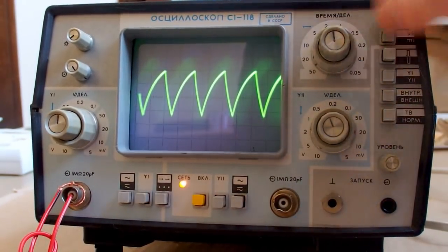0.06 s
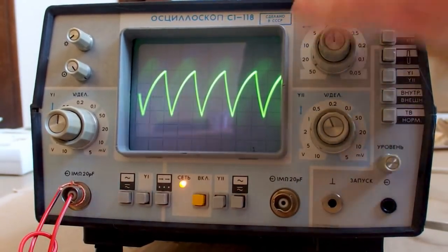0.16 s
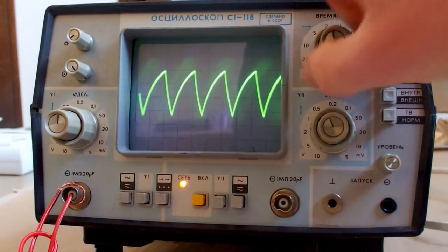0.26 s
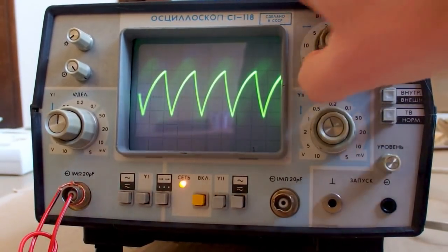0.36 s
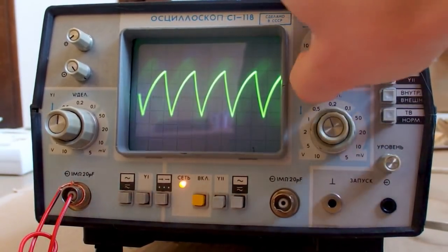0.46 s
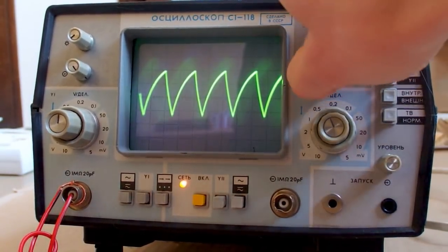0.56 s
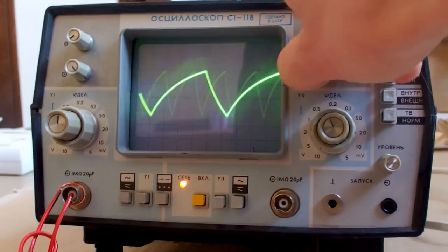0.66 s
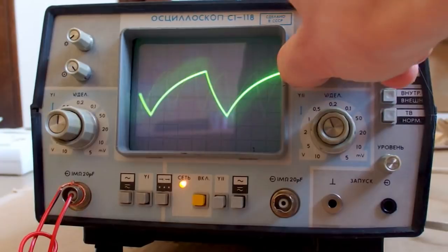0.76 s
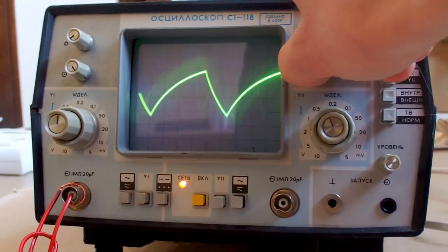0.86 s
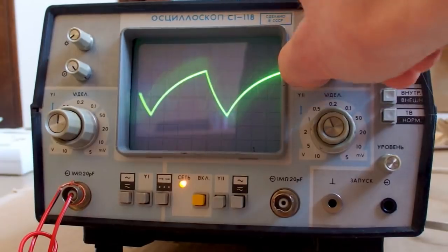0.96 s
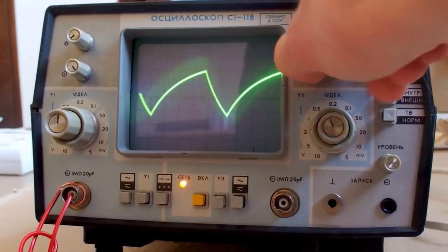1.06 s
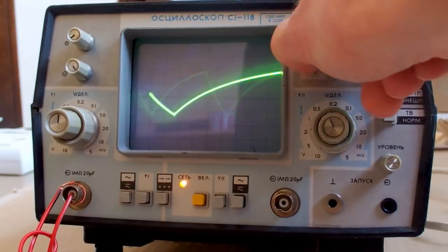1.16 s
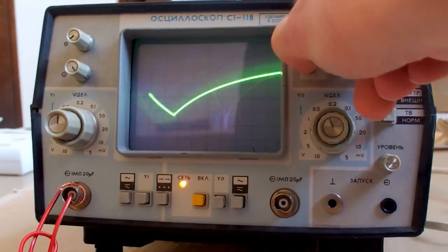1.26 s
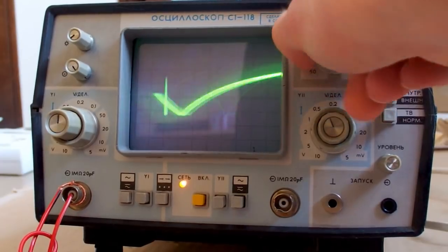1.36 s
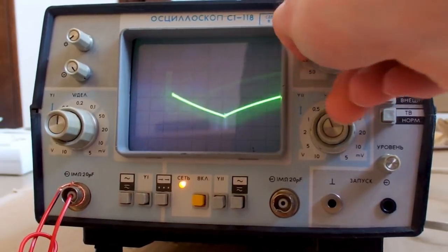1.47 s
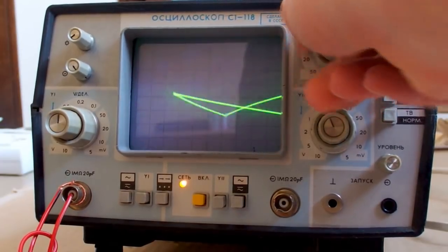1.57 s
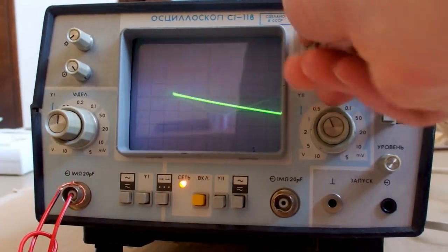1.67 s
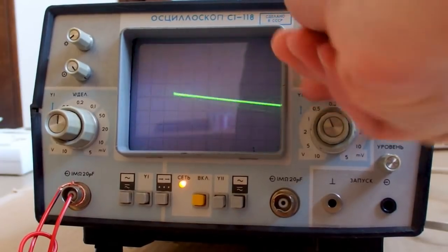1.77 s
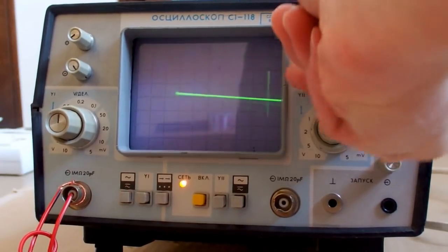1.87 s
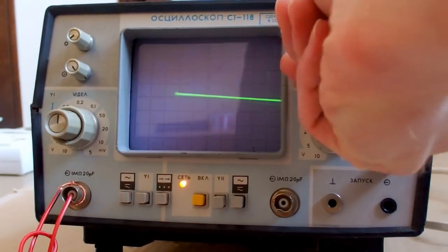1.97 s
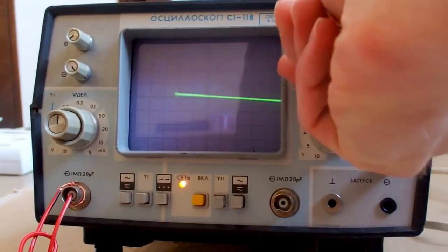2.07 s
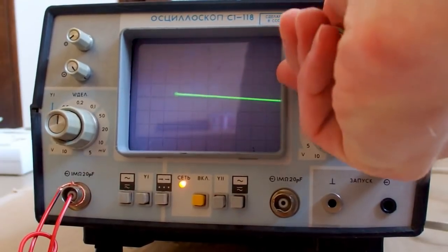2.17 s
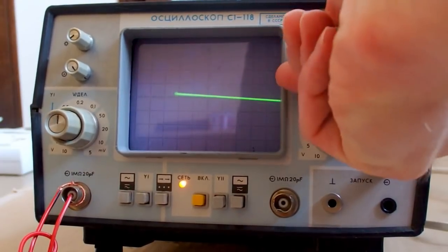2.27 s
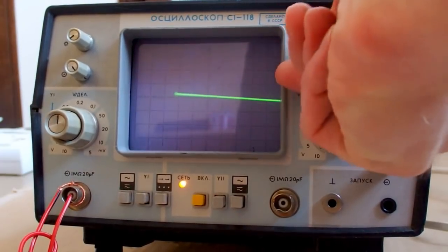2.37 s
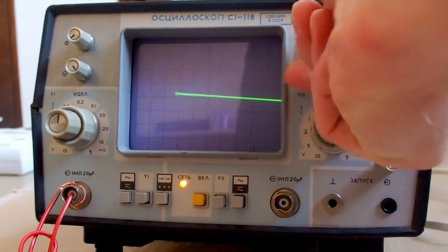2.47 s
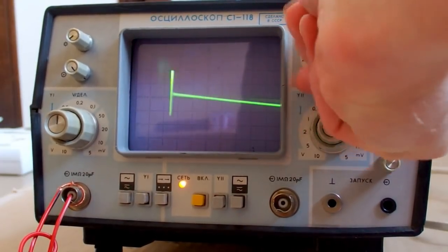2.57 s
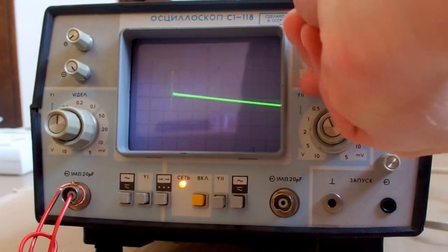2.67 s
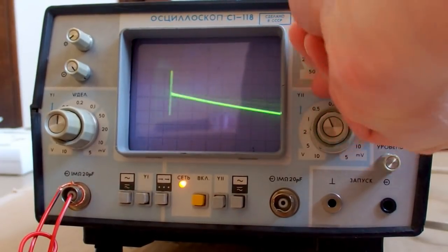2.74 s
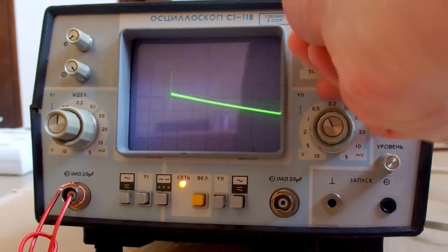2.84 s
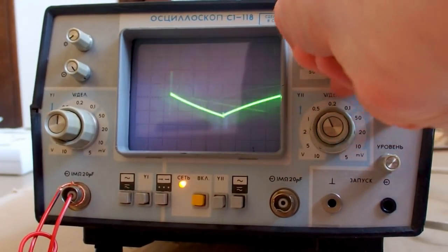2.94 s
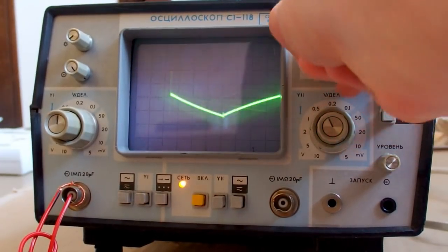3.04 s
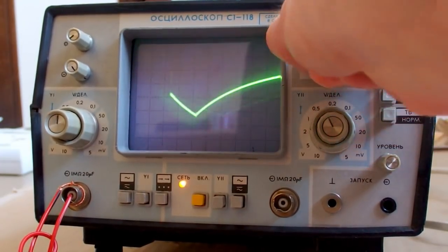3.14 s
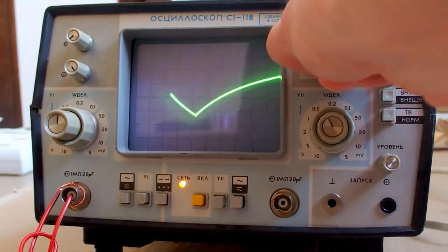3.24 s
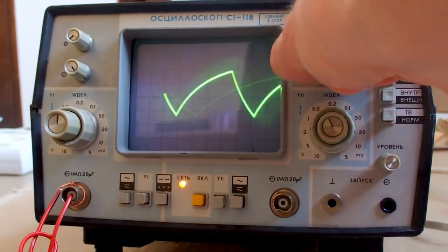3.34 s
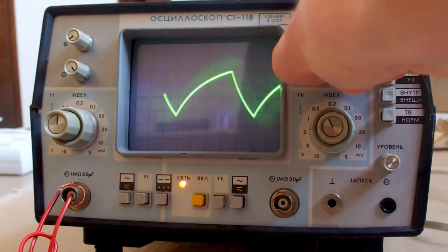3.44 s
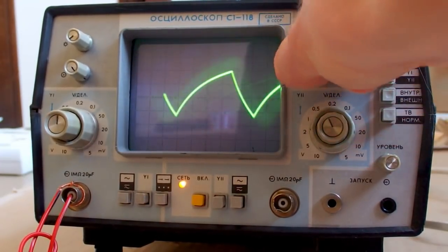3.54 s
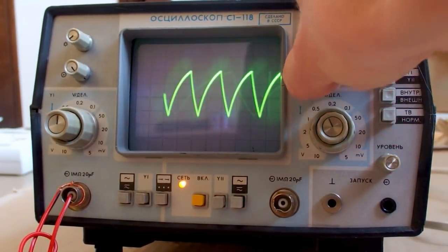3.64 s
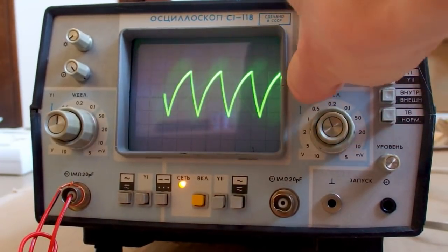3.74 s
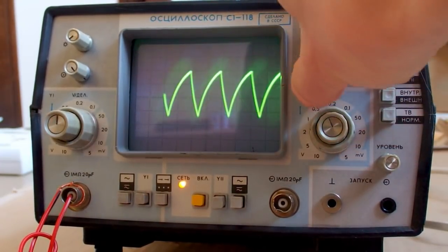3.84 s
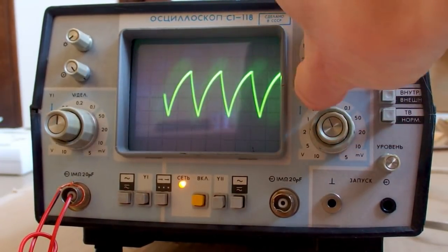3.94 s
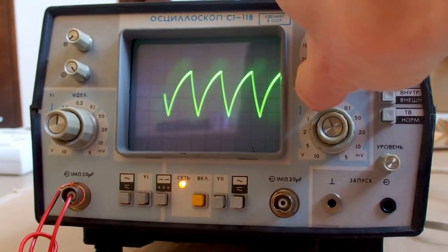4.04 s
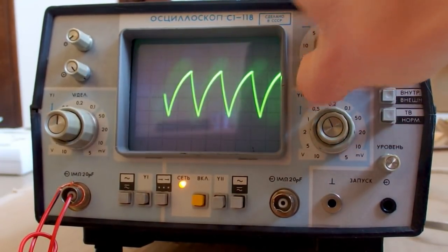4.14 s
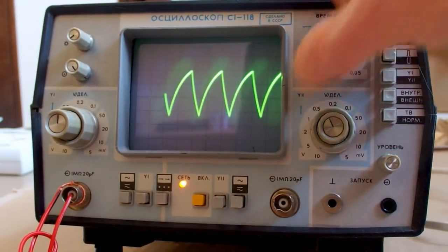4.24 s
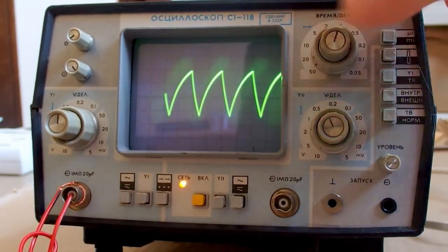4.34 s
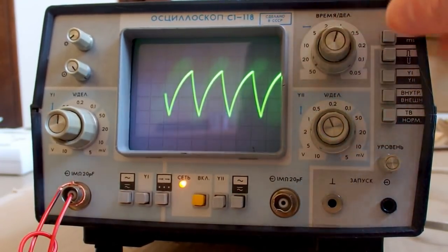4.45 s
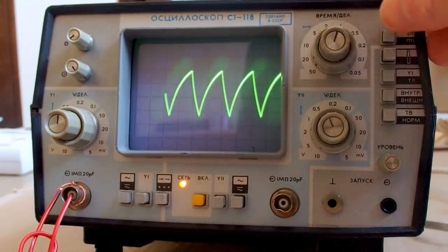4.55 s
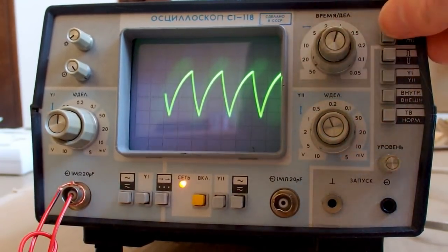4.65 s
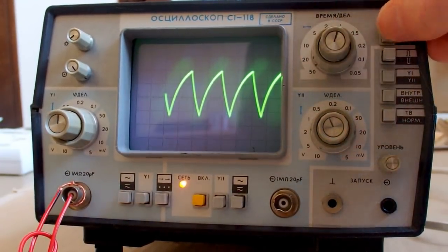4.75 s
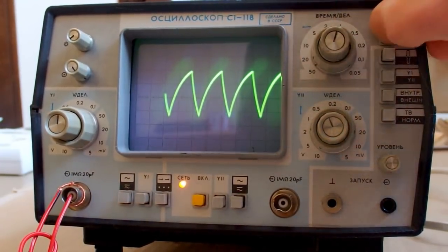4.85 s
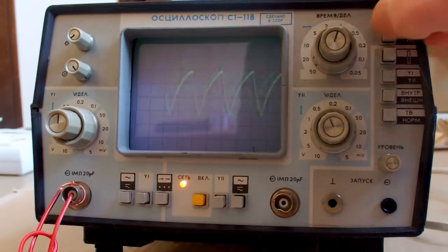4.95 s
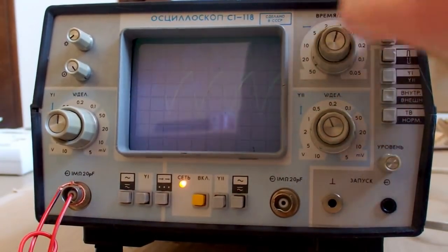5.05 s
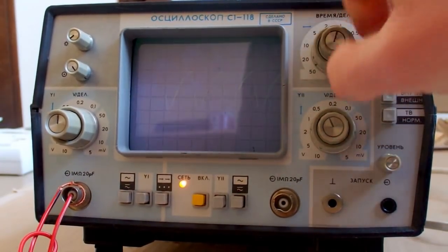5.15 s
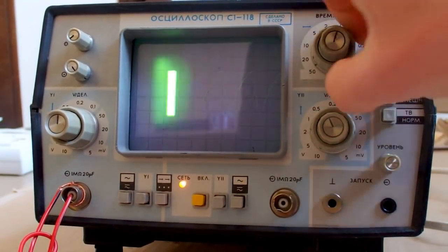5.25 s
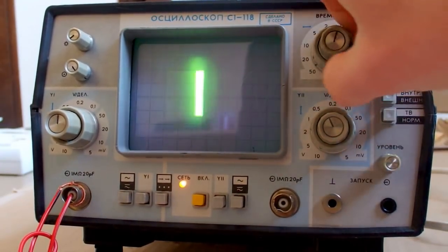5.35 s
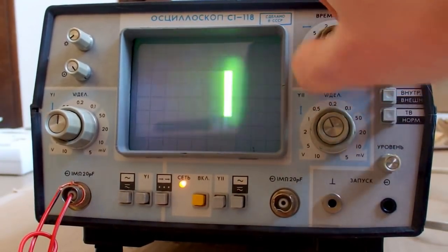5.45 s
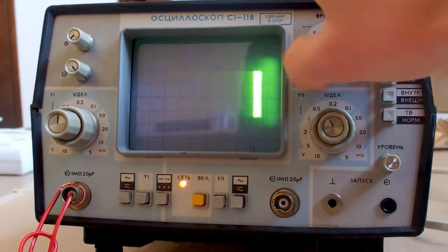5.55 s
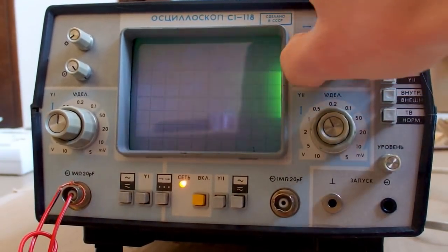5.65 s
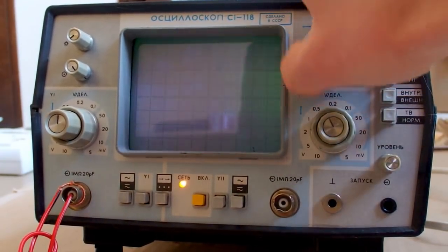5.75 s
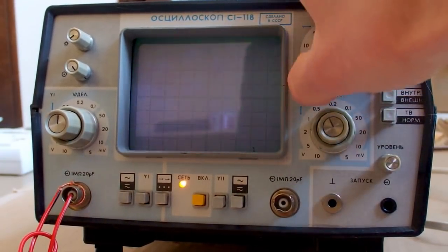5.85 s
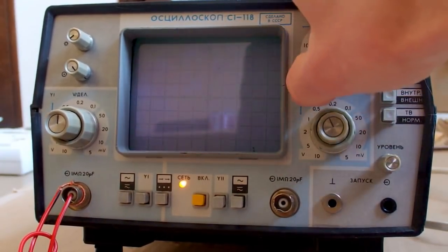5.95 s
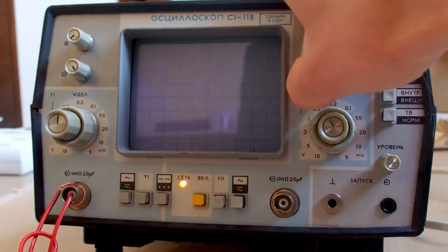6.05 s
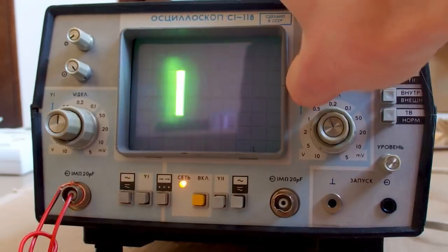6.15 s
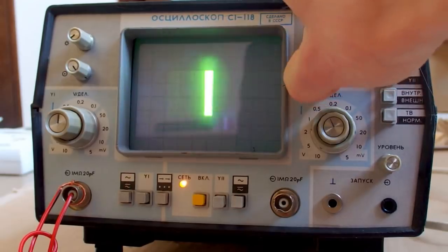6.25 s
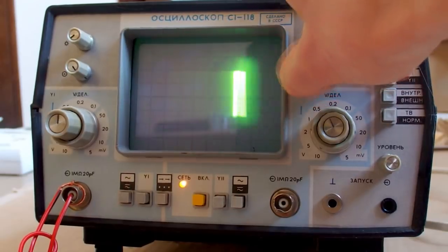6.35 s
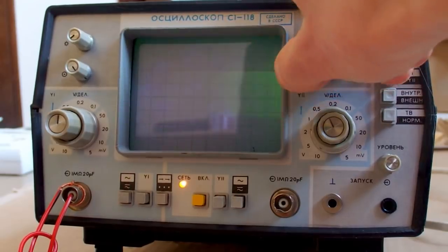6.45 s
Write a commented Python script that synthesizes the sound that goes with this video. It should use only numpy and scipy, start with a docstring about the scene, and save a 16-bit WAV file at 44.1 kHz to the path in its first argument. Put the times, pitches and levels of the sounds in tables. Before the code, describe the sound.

A small quiet room, heard in close stereo, with very faint low transformer hum, soft air noise and a barely audible thin whine. From 0.07 to 0.35 s fingers rub and bump softly on an instrument panel. At 0.45 s a stiff rotary switch snaps: a loud, bright metallic crack with a tiny spring ring, dull shaft knock and short case resonance. Six more follow at 0.68, 0.93, 1.19, 1.37, 1.51 and 1.64, quickening. A pause holds a light bump near 2.05 and a faint sagging squeak at 2.2. Six clacks turn it back from 2.36 to 3.37, slightly fuller. Soft bumps near 4 lead to a strong knock at 4.1, then crisp button taps at 4.55 and a double one at 4.7. Light fumbling and a thin tick fill 5.2 to 5.6. Two final clacks land at 6.14 and 6.34 over skin rubbing, with short room tails.

```python
"""Rotary switch on an oscilloscope

A hand turns the range switch, close by, in a small room. At each detent a steel spring snaps home
and rings: a noise burst and a short sine, over decaying sines for the knock of panel and case.
Before and between the runs fingers bump knobs and buttons with softer blows on the same panel.
Filtered noise makes the rubbing skin and still air; a wobbling sine is the knob's one squeak.
Steady sines make the faint transformer hum, and resonant noise a faint whine."""
import sys
import numpy as np
from scipy import signal
from scipy.fft import rfft, irfft, next_fast_len
from scipy.io import wavfile
from scipy.ndimage import uniform_filter1d

SR = 44100
rng = np.random.default_rng(int(sys.argv[2]) if len(sys.argv) > 2 else 0)


def unload_wav(signal):
    """Save mono or channel-first audio to the path in sys.argv[1] as 16-bit WAV at rate SR, clipped to [-1, 1]."""
    wavfile.write(
        sys.argv[1],
        SR,
        np.round(np.clip(np.atleast_2d(signal).T, -1, 1) * 32767).astype(np.int16),
    )


N = 287091

# mains transformer hum: (frequency [Hz], RMS level [dB])
HUM = [(100, -58.5), (200, -74.5), (500, -80.5), (700, -76)]
# still air: (frequency [Hz], noise density [dB per Hz])
STILL_AIR = [(22, -106), (50, -81.5), (80, -77.5), (125, -81.5), (210, -85), (310, -95), (700, -98),
             (1400, -101), (2600, -102.5), (4000, -105), (7500, -111), (15000, -109.5)]
# the hand rubs on knob and panel: (start [s], end [s], level [dB])
RUBS = [(0.063, 0.434, -55.5), (.45, 1.7, -61), (2.02, 2.054, -62.5), (2.33, 3.4, -62.5),
        (4.035, 4.22, -54), (4.516, 4.74, -61.5), (5.188, 5.24, -52.5), (6.117, 6.497, -54)]
# dry skin on plastic: (frequency [Hz], gain [dB])
SKIN = [(150, -20.5), (420, -7), (780, 1), (1100, -7), (1800, -13), (2400, -21), (4000, -19.5), (9000, -35),
        (15000, -39.5)]
# first reflections from bench and walls: (nominal delay [s], gain [ratio])
ECHOES = [(.0023, .25), (.0052, .17), (0.0125, .1), (0.0163, 0.077)]
# how long the room rings: (frequency [Hz], t60 [s])
ROOM_T60 = [(100, 0.32), (400, 0.38), (1000, 0.36), (3500, 0.4249), (7000, 0.36), (13000, 0.21)]
# how loud the room answers: (frequency [Hz], echo level [dB])
ROOM_LEVEL = [(70, 7), (200, 5.5), (400, 2.5), (1000, -1), (2500, -3.5), (3700, -8), (5000, -8), (9000, -9),
              (13000, -7)]
# fingers bump knobs and buttons:
# (time [s], force [dB], nominal thud pitch [Hz], thud gain [dB], top gain [dB])
BUMPS = [ (0.07, -24, 600, 11.5, -10), (.086, -20.5, 487, 4, -7), (0.1815, -17, 595, -5, -5.5),
         (0.2681, -24, 603, -16, -11), (0.351, -25.5, 753, 9, -10), (2.046, -23, 602, -2.5, -8),
         (3.9829, -26.5, 642, 2, -9), (4.053, -20.5, 800, 8, -17), (4.1002, -3, 810, 6, 1.5),
         (4.395, -33, 760, 10, -13), (4.5497, -19, 770, -2.5, 10), (4.6184, -38.5, 720, 18, -7),
         (4.7099, -11.5, 700, -2, 11), (4.7332, -10, 476, 3, 2), (5.203, -26.5, 560, 14.5, 6.5),
         (5.2255, -27, 780, 14, -20), (5.359, -32.5, 787, -6, -19), (5.5774, -27.5, 687, 8.5, -18)]
# a fingertip softens the top of a blow: (frequency [Hz], gain [dB])
FINGER_PAD = [(200, -2.5), (600, -1), (1850, 1.5), (2300, -5), (4000, -3.5), (12000, -3)]
# the bare snap of metal on metal: (frequency [Hz], gain [dB])
SNAP = [(30, -23.5), (80, 2), (200, 4), (290, 0), (450, 5), (1000, 8.5), (1700, 7), (2100, 8), (2600, 10.5),
        (3700, 12), (4800, 6.5), (7000, 5.5), (9300, 2.5), (10800, -5), (15500, -5)]
# panel and case modes: (nominal frequency [Hz], relative level [dB], t60 [s])
CASE_MODES = [(77, -45.5, .25), (123, -46, 0.41), (191, -42.5, 0.16), (364, -41, 0.068), (410.3, -32.5, .1),
              (490, -34, 0.098), (668.7, -28.5, 0.089), (790, -29, .09), (886, -29.5, .06),
              (1040, -32.5, 0.13), (1198, -29.5, 0.087), (1353, -37, .06), (1466, -36.5, .07),
              (1626, -32, 0.087), (1765, -23, .055), (2316, -34.5, .04), (2430, -33, .06),
              (2520, -33.5, .04), (2770, -34, .06), (3108, -30, .035), (3760, -28, 0.069),
              (3880, -35, 0.077)]
# centres of the colour controls: bass, low, middle, neutral, top ([Hz] each)
COLOUR_HZ = [180, 600, 1800, 4500, 11000]
# one row a detent: (time [s], force [dB], spring pitch [Hz], spring ring gain [dB],
# thud gain [dB], panel clack gain [dB], top gain [dB])
DETENTS = [ (.4486, -2, 3850, -6.5, 3.5, 2, -2.5), (.6798, -0.5, 3600, -1.5, 2, -4.5, 3.5),
           (.9261, 1.5, 2470, -6.5, -2, 5, -0.5), (1.188, 0, 3980, -3, 1, 0, -.5),
           (1.368, 1, 4110, -7, -1, -5, -2.5), (1.5115, -0.5, 3780, 0.5, -2, -7.5, -6),
           (1.6433, -2, 3850, 0.5, -2, -5, -6), (2.3639, -2.5, 3300, -4, -6.5, 1.5, 6),
           (2.5227, 0.5, 3560, -1, -4, -2, 0), (2.7011, 1, 3950, -8.5, -3.5, 1, 0),
           (2.8647, 0, 4030, -13, -4, 2, 1), (3.1083, 1, 3990, -8, .5, 3, 2),
           (3.3685, -3, 3490, 2.5, -5.5, 2.5, 1), (6.1434, 2, 3790, -11, 5, 2.5, 1.5),
           (6.3357, -0.5, 3785, 1, 1, 1.5, -0.5)]
# the knob is turned back between these times: (start [s], end [s])
TURN_BACK_S = (2.3, 3.5)
# a small contact spring ticks: (pitch [Hz], level [dB], decay time constant [s])
TICK = (7200, -21, 0.00046)

# time and frequency axes of one short sound, and a bare impulse of the same length
T = np.arange(SR // 6) / SR
HZ = np.fft.rfftfreq(len(T), 1 / SR)
CLICK = signal.unit_impulse(len(T))


def amp(db):
    """Decibels to gain."""
    return 10 ** (np.asarray(db) / 20)


def read(points, hz):
    """Reads a table on a log-frequency axis."""
    f, value = np.transpose(points)
    return np.interp(np.log(hz + 1), np.log(f), value)


def unit(x):
    """Scales to an energy of one."""
    return x / np.linalg.norm(x, axis=-1, keepdims=True)


def add(mix, s, sound):
    """Mixes a sound in at time s."""
    part = mix[..., round(s * SR):][..., :sound.shape[-1]]
    part += sound[..., :part.shape[-1]]


def colour(x, points):
    """Causal minimum-phase filter with the given (frequency [Hz], gain [dB]) outline."""
    size = 4096
    log_gain = np.log(amp(read(points, abs(np.fft.fftfreq(size, 1 / SR)))))
    spectrum = np.exp(np.conj(signal.hilbert(log_gain)))
    taps = np.fft.ifft(spectrum).real[:size // 2]
    return signal.fftconvolve(x, taps)[:len(x)]


def mains_hum():
    """The transformer hums at steady pitches, one sine each, alike on both sides."""
    t = np.arange(N) / SR
    return sum(amp(db) * np.sqrt(2) * np.sin(2 * np.pi * (hz * t + rng.random())) for hz, db in HUM)


def still_air():
    """Noise shaped by density: rumble largely common to both sides, hiss more separate."""
    hz = np.fft.rfftfreq(next_fast_len(N + N % 2, real=True), 1 / SR)
    noise = rfft(rng.standard_normal((2, 2 * len(hz) - 2)))
    mid, side = noise * amp(read(STILL_AIR, hz)) * np.sqrt(SR / 2)
    side *= amp(read([(100, -6.5), (1000, -4), (6000, -1)], hz))
    return irfft(np.array([mid + side, mid - side]))[:, :N]


def whine(hz=1490, pole_width_hz=30, level_db=-76, waver_db=5, waver_s=.09):
    """Noise through a sharp double resonance: a faint narrow whine that swells and fades."""
    t = np.arange(N) / SR
    radius = np.exp(-np.pi * pole_width_hz / SR)
    pole = radius * np.exp(2j * np.pi * hz / SR)
    tone = signal.lfilter([1], np.poly([pole, pole]), rng.standard_normal(N)).real
    knots = np.arange(0, t[-1], waver_s)
    waver = np.interp(t, knots, rng.standard_normal(len(knots)))
    return tone / tone.std() * amp(level_db + waver_db * waver)


def rubbing(grain_db=3, grain_s=.012, attack_s=0.015, release_s=0.076):
    """Skin drags unevenly over the panel; each stroke sets in, holds and dies away."""
    t = np.arange(N) / SR
    strokes = np.zeros(N)
    for start, end, db in RUBS:
        onset = np.clip((t - start) / attack_s, 0, 1)
        release = np.exp(-np.maximum(t - end, 0) / release_s)
        strokes += amp(db) * onset * release
    drag = colour(rng.standard_normal(N), SKIN)
    knots = np.arange(0, t[-1], grain_s)
    slips_db = grain_db * np.interp(t, knots, rng.standard_normal(len(knots)))
    return drag / drag.std() * strokes * amp(slips_db)


def near(x, side_db=-16, side_top_db=-5):
    """The direct sound and first reflections; left and right differ most in the treble."""
    mid = CLICK.copy()
    for delay, gain in ECHOES:
        mid[int(delay * rng.uniform(.93, 1.07) * SR)] += gain
    scatter = unit(rng.standard_normal(len(T)) * T * np.exp(-T / 0.00026))
    side = colour(scatter, [(800, -17), (3500, side_db), (12000, side_top_db)])
    return signal.fftconvolve(x[None], np.array([mid + side, mid - side]), axes=1)[:, :N]


def room(x, build_s=0.0056, width=0.11, top_width=.55):
    """A diffuse noise tail that dies band by band and is wider in the treble."""
    hz, t, z = signal.stft(rng.standard_normal((2, SR // 2)), SR, nperseg=256)
    t60 = read(ROOM_T60, hz)[:, None]
    tail = signal.istft(z * amp(-60 * t / t60) / np.sqrt(t60), SR, nperseg=256)[1]
    build = 1 - np.exp(-(np.arange(tail.shape[1]) / SR / build_s) ** 2)
    mid, side = (colour(v, ROOM_LEVEL) for v in unit(tail * build))
    side = colour(side, [(500, 20 * np.log10(width)), (7000, 20 * np.log10(top_width))])
    return signal.fftconvolve(x[None], np.array([mid + side, mid - side]), axes=1)[:, :N]


def lead_in(level_db, top_db, length_s=.03, swell_s=.0055):
    """A faint short swell of noise leads into each blow."""
    t = T[T < length_s]
    noise = unit(np.exp(t / swell_s) * rng.standard_normal(len(t)))
    return amp(level_db) * colour(colour(noise, SNAP), [(3800, 0.002), (10000, top_db)])


def snap(contact_s, rise_s, chatter=.12, chatter_s=0.0044):
    """A burst of tiny collisions, evened out then metal-coloured; loose parts chatter on briefly."""
    decay = np.exp(-T / contact_s) + chatter * np.exp(-T / chatter_s)
    burst = unit((1 - np.exp(-T / rise_s)) * decay * rng.standard_normal(len(T)))
    power = uniform_filter1d(abs(rfft(burst)) ** 2, size=300)
    outline_db = read(SNAP, HZ) - 10 * np.log10(power + 1e-9)
    return colour(burst, np.c_[HZ + 1, outline_db])


def knock(hz, level_db, delay_s=0.00396, decay_s=.0013):
    """A moment after contact the shaft seats and thuds; pitch and delay vary a little."""
    u = np.maximum(T - delay_s * rng.uniform(0.842, 1.135), 0)
    swell_and_die = u / decay_s * np.exp(-u / decay_s)
    return amp(level_db) * swell_and_die * np.sin(2 * np.pi * hz * rng.uniform(.92, 1.06) * u)


def case(scatter_db=2.5, detune=0.0062, slowest_build_s=.009, lag_hz=1000):
    """The blow spreads through the panel as ringing modes; low ones build up later than high ones."""
    hz, db, t60 = np.transpose(CASE_MODES)[:, :, None]
    size, shift, phase = rng.standard_normal((3, len(CASE_MODES), 1))
    swell = np.minimum(T * (1 + hz / lag_hz) / slowest_build_s, 1)
    wave = np.sin((2 * np.pi * (hz * (1 + detune * shift) * T + phase)).astype("float32"))
    decay = np.exp(-np.log(1000) * T / t60)
    return (amp(db + scatter_db * size) * decay * swell * wave).sum(0)


def blow(sound, force_db, bass_db, low_db, middle_db, top_db):
    """The grip of the hand sets the strength and colour of each blow."""
    gains_db = [bass_db, low_db, middle_db, 0, top_db]
    return amp(force_db) * colour(sound, list(zip(COLOUR_HZ, gains_db)))


def fingers(case_db=-2, body_wet_db=-4, full_contact_s=.0017, contact_law=0.32, tick_s=5.5218):
    """Softer blows on the same panel, the contact longer as force drops, and one thin tick."""
    direct, spread = np.zeros((2, N))
    for s, force_db, hz, thud_db, top_db in BUMPS:
        contact_s = full_contact_s * amp(force_db) ** -contact_law
        # a bright nail tap moves the panel less than a dull fingertip
        clack_db = -2 - .3 * top_db
        tone = 0, 0, clack_db, top_db
        thud = amp(thud_db) * knock(hz, level_db=-14.0, delay_s=0.00334, decay_s=0.002)
        body = thud + amp(case_db) * case()
        lead = amp(force_db) * lead_in(level_db=-6.0, top_db=-8)
        add(direct, s - len(lead) / SR, lead)
        add(direct, s, blow(snap(contact_s, rise_s=contact_s / 2) + body, force_db, *tone))
        add(spread, s, blow(colour(CLICK, SNAP) + amp(body_wet_db) * body, force_db, *tone))
    thin_tick = tick()
    add(direct, tick_s, thin_tick)
    add(spread, tick_s, 0.46 * thin_tick)
    return near(colour(direct, FINGER_PAD)) + room(colour(spread, FINGER_PAD))


def spring(hz, decay_s=.00095, level_db=-1.0):
    """The detent spring is a sine that swells and dies fast, within a few dozen cycles."""
    swell_and_die = T / decay_s * np.exp(-T / decay_s)
    return amp(level_db) * swell_and_die * np.sin(2 * np.pi * (hz * T + rng.random()))


def switch(case_db=-1, body_wet_db=-6, spring_hump_db=5, patterns=3):
    """Lead-in, snap, ring, knock and case; detents take turns through three slightly different echo patterns."""
    direct, spread = np.zeros((2, patterns, N))
    for k, (s, force_db, hz, ring_db, thud_db, clack_db, top_db) in enumerate(DETENTS):
        # turning back, the hand rocks the case with more bass
        bass_db = 2.5 if TURN_BACK_S[0] < s < TURN_BACK_S[1] else 0
        tone = bass_db, thud_db, clack_db, top_db
        pattern = k % patterns
        lead = amp(force_db) * lead_in(level_db=-13.0, top_db=-15.0)
        add(direct[pattern], s - len(lead) / SR, lead)
        body = knock(hz=875, level_db=-15.0) + amp(case_db) * case()
        crack = snap(contact_s=0.0014, rise_s=0.00052, chatter=0.36, chatter_s=.004)
        ring = amp(ring_db) * spring(hz)
        add(direct[pattern], s, blow(crack + body + ring, force_db, *tone))
        # the walls gather snap and spring from all directions, so their echo has a smooth spectrum
        hump = [(0.77 * hz, 0), (hz, spring_hump_db + ring_db / 2), (1.2 * hz, 0)]
        radiated = colour(colour(CLICK, SNAP), hump) + amp(body_wet_db) * body
        add(spread[pattern], s, blow(radiated, force_db, *tone))
    return sum(near(a) + room(b) for a, b in zip(direct, spread))


def squeak(start_s=2.203, length_s=.135, start_hz=800, start_db=-51.5, jitter=0.053,
           overtone_db=-14, stutter_db=3, sag_hz_per_s=380, fade_db_per_s=88, edge_s=0.012):
    """Stick and slip as the grip tightens: an unsteady tone and weak third harmonic, sagging as it fades."""
    t = np.arange(0, length_s, 1 / SR)
    pitch_noise, grip_noise = rng.standard_normal((2, N))
    wobble = uniform_filter1d(pitch_noise, size=150)[:len(t)]
    grip = uniform_filter1d(grip_noise, size=700)[:len(t)]
    pitch_hz = (start_hz - sag_hz_per_s * t) * (1 + jitter * wobble / wobble.std())
    phase = 2 * np.pi * np.cumsum(pitch_hz) / SR
    edges = np.minimum(np.minimum(t, length_s - t) / edge_s, 1)
    level = edges * amp(start_db - fade_db_per_s * t + stutter_db * grip / grip.std())
    out = np.zeros(N)
    add(out, start_s, level * (np.sin(phase) + amp(overtone_db) * np.sin(3 * phase)))
    return out


def tick():
    """A small contact spring: a high sine and bright noise, dying almost at once."""
    hz, db, decay_s = TICK
    bright_noise = np.diff(rng.standard_normal(len(T) + 1))
    return amp(db) * np.exp(-T / decay_s) * (np.sin(2 * np.pi * hz * T) + 0.36 * bright_noise)


def scene(right_db=0.15):
    """The knob sits slightly to the right, over the steady sounds of the room."""
    friction = rubbing() + squeak()
    hand = switch() + fingers() + near(friction) + 0.46 * room(friction)
    balance = amp([[-right_db / 2], [right_db / 2]])
    return hand * balance + still_air() + mains_hum() + whine()


def record(dry, edge_hz=15900):
    """A steep low-pass limits the band."""
    taps = signal.firwin(511, edge_hz, window=("kaiser", 9), fs=SR)
    return signal.oaconvolve(dry, taps[None], "same")


dry = scene()
out = record(dry)
unload_wav(out)
```